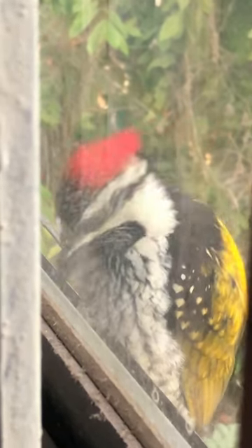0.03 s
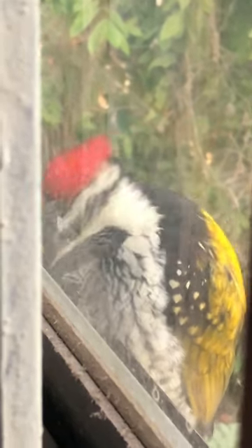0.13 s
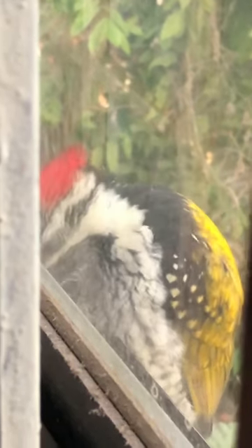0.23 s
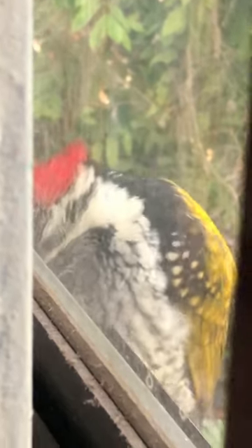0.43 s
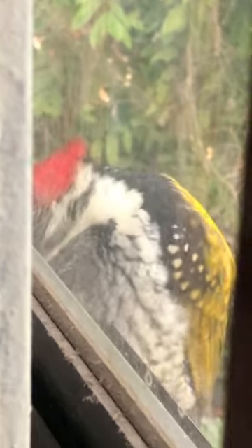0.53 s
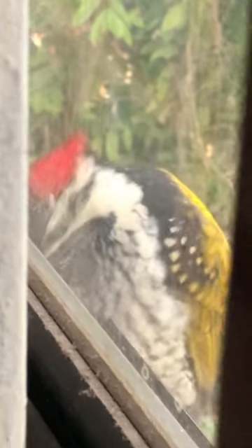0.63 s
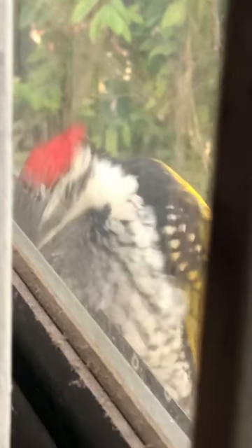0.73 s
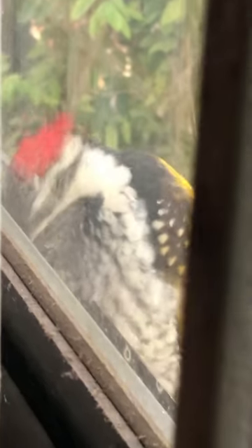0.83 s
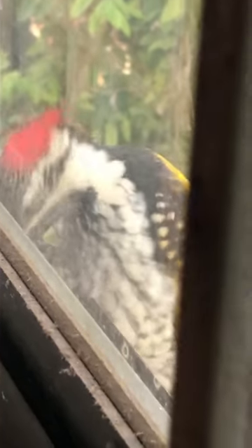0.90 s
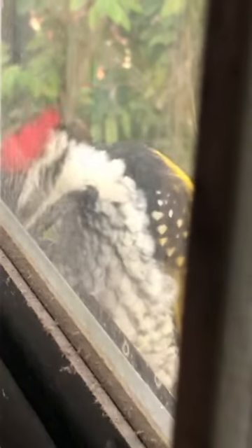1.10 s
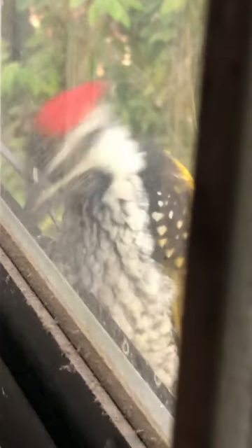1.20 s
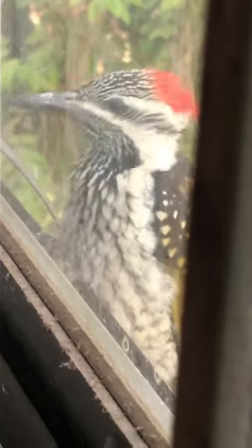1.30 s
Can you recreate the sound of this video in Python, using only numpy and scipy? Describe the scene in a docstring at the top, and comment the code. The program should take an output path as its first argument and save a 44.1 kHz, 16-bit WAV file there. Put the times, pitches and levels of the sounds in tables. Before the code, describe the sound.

A woodpecker drums on a window, heard from inside a room over faint low outdoor rumble and hiss. A very soft tap at 0.15 s, a sharper one at 0.24 with slight feather rustle, weak taps at 0.33 and 0.37, then from 0.4 to 1.16 a roll of about 25 knocks per second, growing louder, then easing slightly. Crisp double ticks, hollow pane ring, short room tail.

```python
"""A woodpecker drums on a window pane and its frame, heard from inside the room.
Faint outdoor rumble and hiss, shaped from noise, run throughout; feathers and claws rustle at the start.
A few uneven blows lead into a quick roll. Each blow is a double tick with fainter returns, a short bright
scatter and fizz of noise, ringing modes of frame and pane as sines, and the pane's return across the room.
A noise tail, each band dying at its own speed, follows as the room."""
import sys
import numpy as np
from scipy import signal
from scipy.fft import rfft, irfft
from scipy.io import wavfile

SR = 44100
rng = np.random.default_rng(int(sys.argv[2]) if len(sys.argv) > 2 else 0)


def log_audio(samples):
    """Write samples as a 16-bit WAV file to the path given in sys.argv[1]."""
    # one column per channel
    frames = np.atleast_2d(samples).T
    # limit to full scale, then quantise
    limited = np.clip(frames, -1, 1)
    pcm = np.round(limited * 32767).astype(np.int16)
    wavfile.write(sys.argv[1], SR, pcm)


def volts_from_decibels(level):
    """Turn decibel levels (scalar or array-like) into linear amplitude factors."""
    exponent = np.asarray(level, float) / 20
    return 10 ** exponent


N = 59535
BLOW_SAMPLES = 4096  # length of one blow, before the room


def evened(x):
    """Scales to rms 1."""
    return x / np.sqrt(np.mean(x ** 2) + 1e-20)


def read(points, hz):
    """Reads a table on a log-frequency axis."""
    f, value = np.transpose(points)
    return np.interp(np.log(hz + 1), np.log(f + 1), value)


def coloured(noise, colour):
    """Gives noise a spectrum, closed at both ends, rms 1."""
    hz = np.fft.rfftfreq(len(noise), 1 / SR)
    inside = (hz > colour[0][0] / 2) & (hz < colour[-1][0])
    spectrum = rfft(noise) * volts_from_decibels(read(colour, hz)) * inside
    return evened(irfft(spectrum, len(noise)))


def burst(noise, colour, t, rise_s, t60_s):
    """Coloured noise that rises in a straight line while dying away exponentially."""
    envelope = volts_from_decibels(-60 * t / t60_s) * np.minimum(t / rise_s, 1)
    return envelope * coloured(noise, colour)


def ring(modes, rise_s, t, detune):
    """Decaying sines of alternating sign with a soft start."""
    pitch_hz, level_db, t60_s = np.transpose(modes)[:, :, None]
    sign = (-1.) ** np.arange(len(modes))[:, None]
    tuned_hz = pitch_hz * (1 + detune[:len(modes), None])
    sines = sign * volts_from_decibels(level_db - 60 * t / t60_s) * np.sin(2 * np.pi * tuned_hz * t)
    return (1 - np.exp(-t / rise_s)) ** 2 * sines.sum(0)


def blend(shared, fresh, alike):
    """Mixes a common noise with a blow's own at constant power; alike is the common share."""
    return alike * shared + np.sqrt(1 - alike ** 2) * fresh


def add(mix, start_s, sound):
    """Mixes a sound in at its start time."""
    part = mix[round(start_s * SR):][:len(sound)]
    part += sound[:len(part)]


# Spectrum of the outdoor air: pitch_hz [Hz], level_db [relative dB per Hz]
AIR = [(20, -30), (40, -20), (70, -8.5), (105, -5.5), (150, -7), (220, -13), (350, -18), (450, -22),
       (1000, -30), (2600, -34.5), (9300, -43.5), (13500, -47), (16500, -44)]


def outdoor_air():
    """Steady distant rumble and hiss, from noise heaviest in the lows."""
    return volts_from_decibels(-61) * coloured(rng.standard_normal(N + 1), AIR)[:N]


# Swell of the hiss of feathers and claws: time_s [s], level_db [dB]
RUSTLE_LEVEL = [(.145, -102), (.16, -64.5), (.21, -64.5), (.234, -57.5), (.26, -67), (.4, -82)]
# Spectrum of that hiss: pitch_hz [Hz], level_db [relative dB per Hz]
RUSTLE_COLOUR = [(800, 7), (1500, 15), (5300, 11), (7500, 3), (12000, -6), (15000, -13), (16500, -37)]


def rustle():
    """Feathers and claws: faint coloured noise, strongest around the first two blows."""
    time_s, level_db = np.transpose(RUSTLE_LEVEL)
    level = volts_from_decibels(np.interp(np.arange(N) / SR, time_s, level_db))
    return level * coloured(rng.standard_normal(N + 1), RUSTLE_COLOUR)[:N]


# Fainter returns of the tick: delay_s [s after the first tick], level_db [dB before the tick trim]
TICK_ECHOES = [(.0024, -10), (.0085, -16), (0.0175, -20)]


def ticks(t):
    """The beak's tick, a few cycles long, and its quick returns from the edges of the pane."""
    pitch_hz, width_s = 5050, .0002
    lag_s = 0.000687  # centre of the first tick after contact

    def one(u):
        """A cosine under a bell-shaped envelope."""
        return np.exp(-.5 * (u / width_s) ** 2) * np.cos(2 * np.pi * pitch_hz * u)

    since_tick = t - lag_s
    out = one(since_tick)
    for delay_s, level_db in [(.001146, -1)] + TICK_ECHOES:  # the first return makes the tick double
        out = out + volts_from_decibels(level_db) * one(since_tick - delay_s)
    return volts_from_decibels(-1.4) * out


# Spectrum of the top fizz: pitch_hz [Hz], level_db [relative dB per Hz, before each blow's lean]
FIZZ = [(7500, 3), (9000, -5.5), (11000, -6.5), (13000, -8), (15300, -10), (15900, -10), (16500, -35)]


def fizz(noise, t, lean):
    """Top hiss that starts with a brief snap; each blow's spectrum strays by chance."""
    lean_db = 1.5
    snap_db, snap_s = 5.5, 0.00067
    leaning = [(hz, db + lean_db * chance) for (hz, db), chance in zip(FIZZ, lean)]
    level = volts_from_decibels(8.5 + snap_db * np.exp(-t / snap_s))
    return level * burst(noise, leaning, t, rise_s=0.00023, t60_s=0.052)


# Spectrum of the bright scatter: pitch_hz [Hz], level_db [relative dB per Hz]
SCATTER = [(3200, 5), (4000, 2.5), (5000, 4), (6500, -5), (7700, -11), (8500, -63), (9500, -53)]


def scatter(noise, t):
    """Short bright scatter: a dying burst of noise."""
    return volts_from_decibels(-18) * burst(noise, SCATTER, t, rise_s=0.001, t60_s=0.059)


def hollow_mode(t):
    """The one low mode that keeps ringing, the same at every blow."""
    return ring([(903, -11.5, 0.13)], 0.0018, t, np.zeros(1))  # Hz, dB, t60 s


def bright_mode(t):
    """The one clear high mode, the same at every blow."""
    return ring([(4330, -17.5, 0.059)], 0.0024, t, np.zeros(1))  # Hz, dB, t60 s


# Higher modes of the frame: pitch_hz [Hz before detune], level_db [dB before the frame trim], t60_s [s]
FRAME = [(1790, -10, .04), (1985, -10, .05), (2345, -5, .055), (2650, -8, .04), (3050, -10, .05),
         (3300, -9, .05), (3650, -9, .04)]


def frame(t, detune):
    """The frame's higher modes, as decaying sines."""
    return volts_from_decibels(0.5) * ring(FRAME, 0.0024, t, detune)


# Dense middle modes, as a spectrum: pitch_hz [Hz], level_db [relative dB per Hz]
CLACK = [(1400, 6), (1750, -9), (2150, -4.5), (2600, 3), (3200, -19.5), (3800, -14), (4300, -44)]


def clack(noise, t):
    """Middle modes too dense to single out, as a dying burst of noise."""
    return volts_from_decibels(-6) * burst(noise, CLACK, t, rise_s=0.0024, t60_s=0.079)


# Low modes of the pane: pitch_hz [Hz before detune], level_db [dB before the pane trim],
# peak_s [s after contact], sharpness [exponent of the swell]
PANE = [(311.2, -32, 0.0047, 0.51), (413.6, -33, 0.022, 3.7), (526.3, -13.5, 0.0088, 3.47),
        (700, -5, 0.0063, 3.2), (791.3, -7, 0.0067, 1.9), (920.8, -2, 0.0061, 2.6),
        (1003.7, -3.5, 0.0099, 8.7), (1081.7, -4.5, 0.0053, 4), (1272, -2.5, 0.0028, 0.8),
        (1410, -11, 0.0035, 0.73), (1583, -14, 0.0071, 2.45)]


def pane(t, detune):
    """Dull ring of the pane: slow bending waves make each low mode swell and sink."""
    pitch_hz, level_db, peak_s, sharpness = np.transpose(PANE)[:, :, None]
    swell = (t / peak_s * np.exp(1 - t / peak_s)) ** sharpness
    tuned_hz = pitch_hz * (1 + detune[:len(PANE), None])
    modes = volts_from_decibels(level_db) * swell * np.sin(2 * np.pi * tuned_hz * t)
    return volts_from_decibels(-3) * modes.sum(0)


# The blows: start_s [s], then gains into the layers: tick_db [dB], pane_db [dB], mid_db [dB], fizz_db [dB]
PECKS = [(0.1505, -37, -49.5, -70, -55.5), (0.2362, -19, -28.5, -29.5, -48), (0.3278, -34, -34.5, -42, -64),
         (0.3692, -35.5, -36.5, -41, -65), (0.3957, -21, -28, -35, -49), (0.438, -17.5, -26, -30, -47.5),
         (0.4721, -15.5, -22, -31, -41), (0.5088, -14.5, -21, -33, -40.5), (0.5477, -16, -20, -29, -39.5),
         (0.5856, -12, -18.5, -26, -37.5), (0.6221, -13, -17, -29, -37), (0.6635, -15.5, -19.5, -28, -42),
         (0.701, -11.5, -16.5, -28, -38), (0.7419, -13.5, -21, -21.5, -45),
         (0.7826, -11, -22.5, -27.5, -39), (0.8222, -11, -21, -22.5, -35), (0.8651, -12, -20, -22, -36.5),
         (0.9069, -11.5, -20, -32, -40.5), (0.9487, -13, -20, -24.5, -42.5),
         (0.989, -11.5, -18.5, -26.5, -38), (1.029, -12.5, -19, -30.5, -39.5),
         (1.0688, -14, -19, -31, -40.5), (1.1114, -14, -21.5, -33, -43.5),
         (1.1575, -15.5, -26, -29.5, -42.5)]


def drumming():
    """Every blow lands on nearly the same spot, so all share one ring and most of one scatter."""
    scatter_alike, fizz_alike = .88, .7  # shares of the noise common to all blows
    detune_spread = .004  # spread of the modes between blows, as a fraction of pitch
    wall_s, wall_db = .02, -14  # the pane's ring returns from across the room
    t, out = np.arange(BLOW_SAMPLES) / SR, np.zeros(N)
    shared = rng.standard_normal(BLOW_SAMPLES)
    own = rng.standard_normal((len(PECKS), BLOW_SAMPLES))
    for (start_s, tick_db, pane_db, mid_db, fizz_db), fresh in zip(PECKS, own):
        noise = blend(shared, fresh, scatter_alike)
        hiss = blend(shared, fresh, fizz_alike)
        detune = detune_spread * fresh
        beak = volts_from_decibels(tick_db) * (ticks(t) + scatter(noise, t) + bright_mode(t))
        top = volts_from_decibels(fizz_db) * fizz(hiss, t, fresh)
        middle = volts_from_decibels(mid_db) * (frame(t, detune) + clack(noise, t))
        dull = volts_from_decibels(pane_db) * pane(t, detune[::-1])
        hollow = volts_from_decibels(pane_db) * hollow_mode(t)
        add(out, start_s, beak + top + middle + dull + hollow)
        add(out, start_s + wall_s, volts_from_decibels(wall_db) * dull)
    return out


# Decay time of the room by band: pitch_hz [Hz], t60_s [s]
ROOM_T60 = [(300, 0.37), (800, 0.75), (2000, 0.69), (5500, 0.47), (12000, 0.61)]
# Colour of the room tail: pitch_hz [Hz], level_db [dB before the room trim]
ROOM_COLOUR = [(250, 15.5), (500, 2.5), (680, -1.5), (790, -3), (885, 5), (1000, -13), (1200, -6),
               (2500, -2), (3400, -9), (4500, -12.5), (8000, -8.5), (14000, -16)]


def room(x):
    """A noise tail, each band dying at its own speed."""
    delay_s = .009  # silent this long, then fades in over as long again
    hz, t, z = signal.stft(rng.standard_normal(SR), SR, nperseg=512)
    colour_db, t60_s = read(ROOM_COLOUR, hz), read(ROOM_T60, hz)
    z = z * volts_from_decibels(colour_db[:, None] - 60 * t / t60_s[:, None])
    tail = signal.istft(z, SR, nperseg=512)[1]
    tail = tail * np.clip(np.arange(len(tail)) / SR / delay_s - 1, 0, 1)
    power = np.mean(volts_from_decibels(colour_db) ** 2 * t60_s)  # louder where bands are strong and long
    tail = tail / np.linalg.norm(tail) * np.sqrt(power)
    return volts_from_decibels(-8.5) * signal.fftconvolve(x, tail)[:N]


def scene():
    """Outdoors, the drumming and its room, as one channel."""
    bird = drumming()
    return (outdoor_air() + rustle() + bird + room(bird))[None]


def roll_off(x):
    """The treble ends steeply here."""
    return signal.sosfilt(signal.butter(12, 16800, fs=SR, output="sos"), x)


def record(dry):
    """Closes the top of the band with a steep low-pass and finishes the mix."""
    edge = signal.firwin(255, 16650, window=("kaiser", 8), fs=SR)  # cutoff in Hz
    mix = signal.oaconvolve(dry, edge[None], "same")
    return roll_off(mix)


dry = scene()
out = record(dry)
log_audio(out)
```